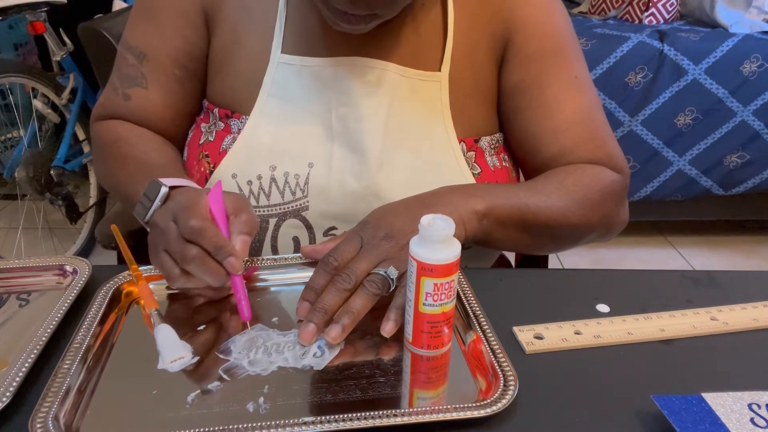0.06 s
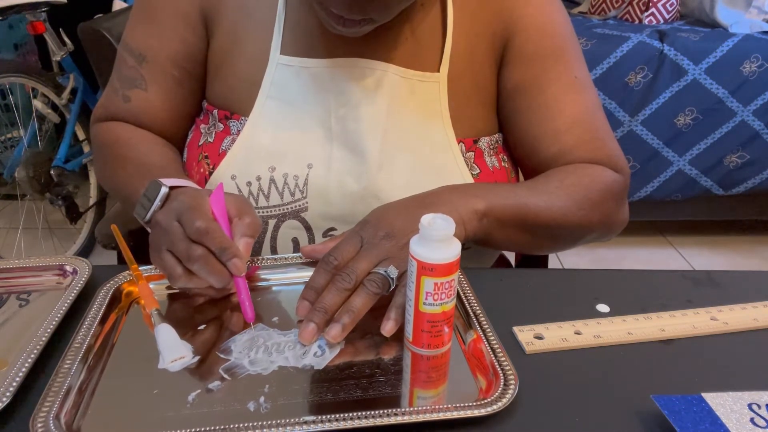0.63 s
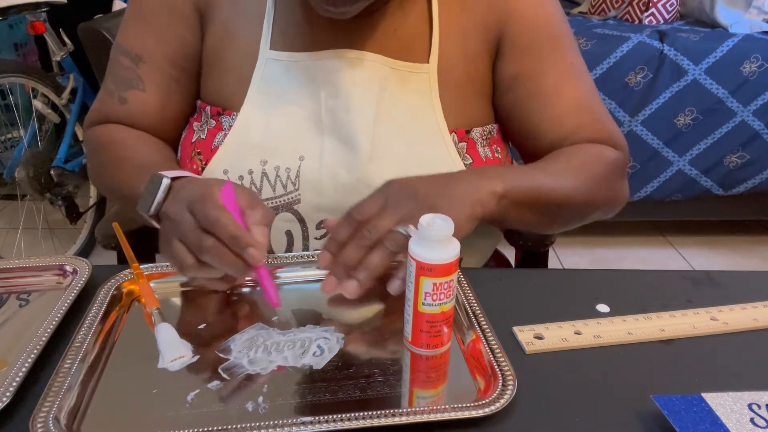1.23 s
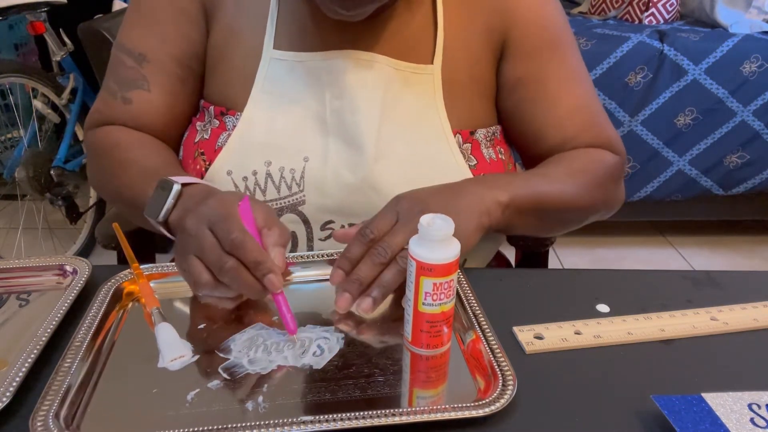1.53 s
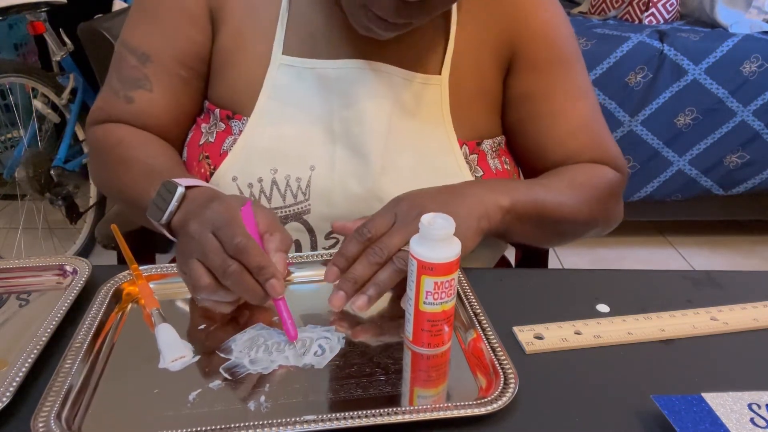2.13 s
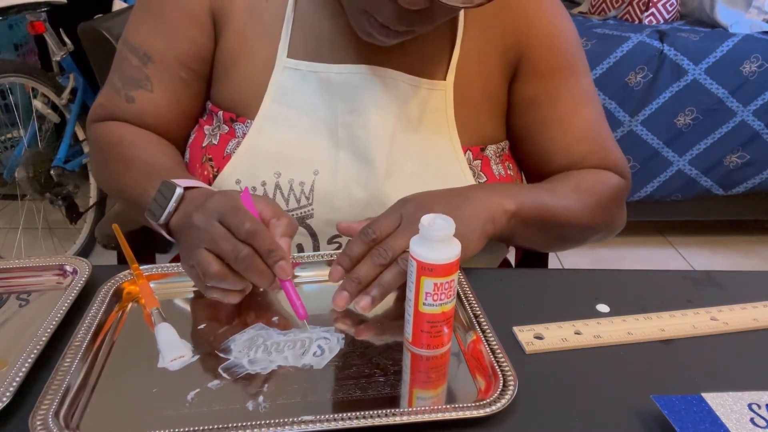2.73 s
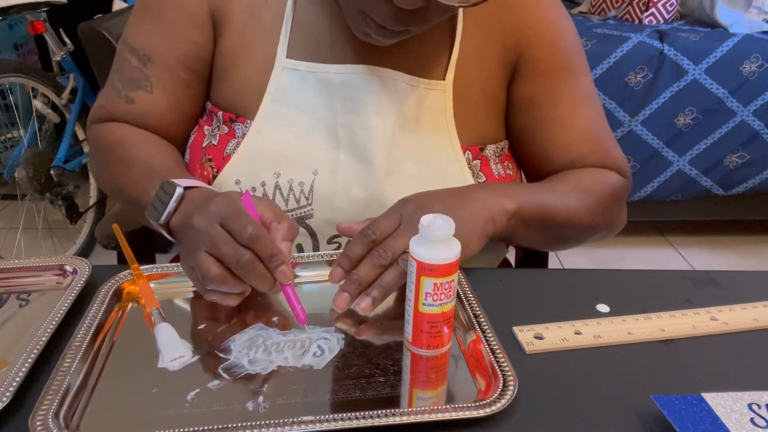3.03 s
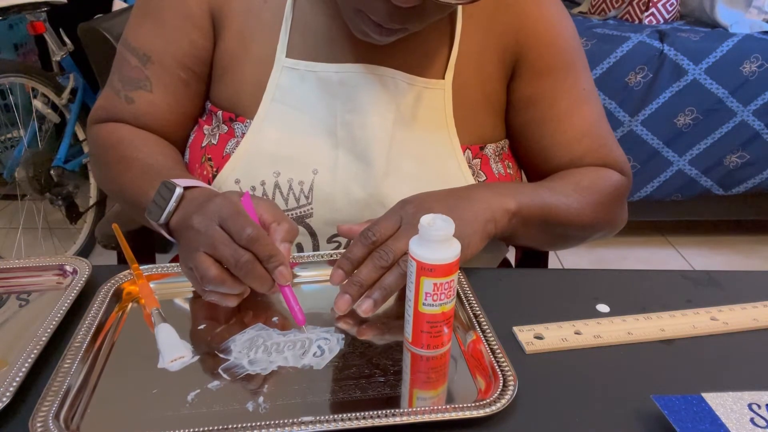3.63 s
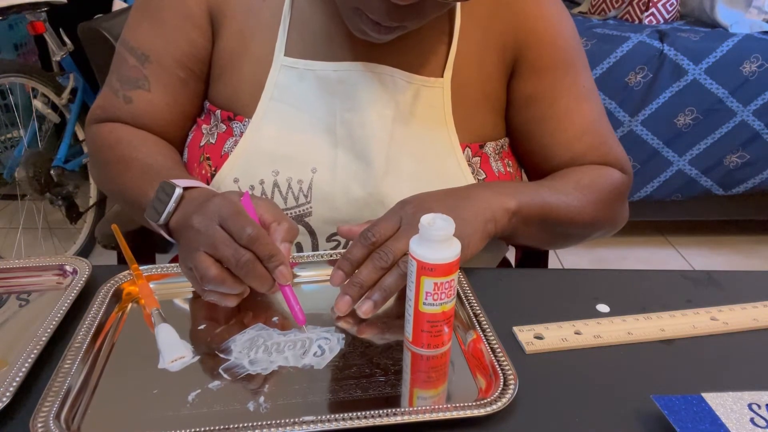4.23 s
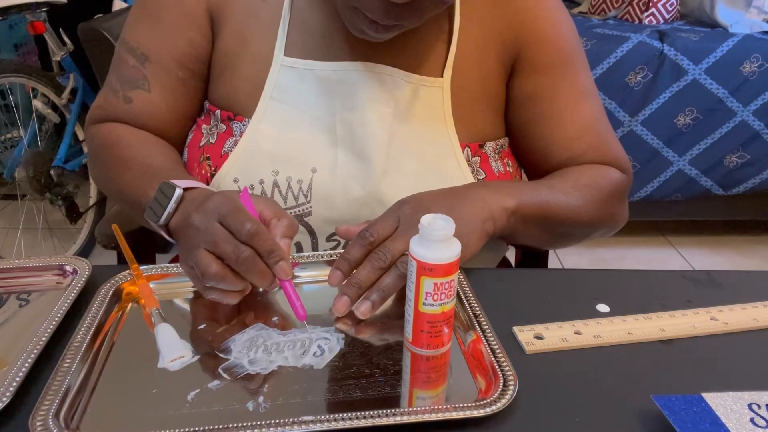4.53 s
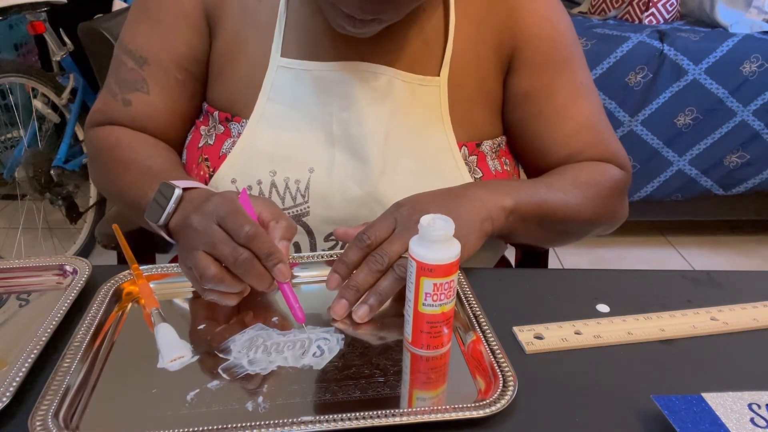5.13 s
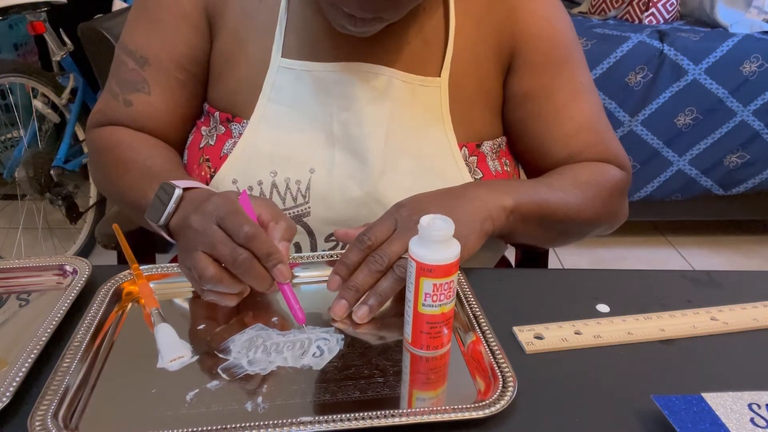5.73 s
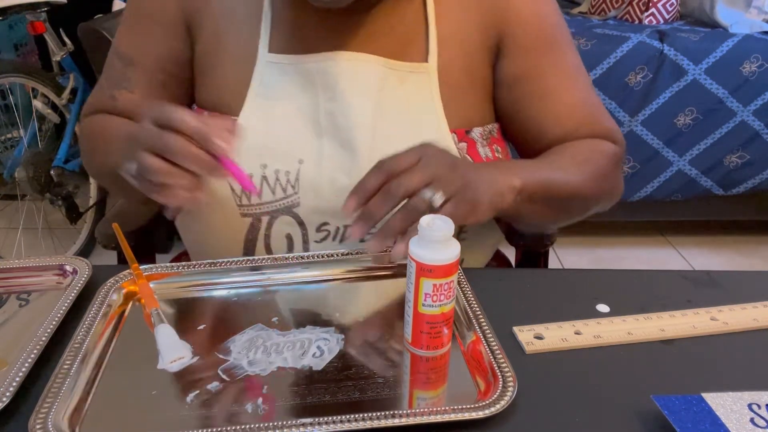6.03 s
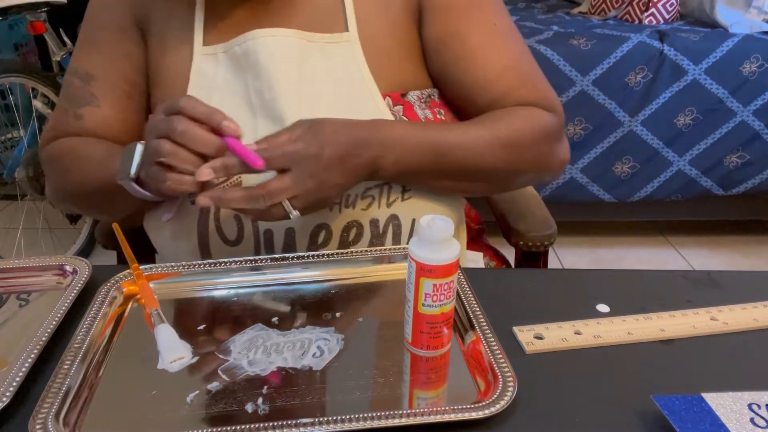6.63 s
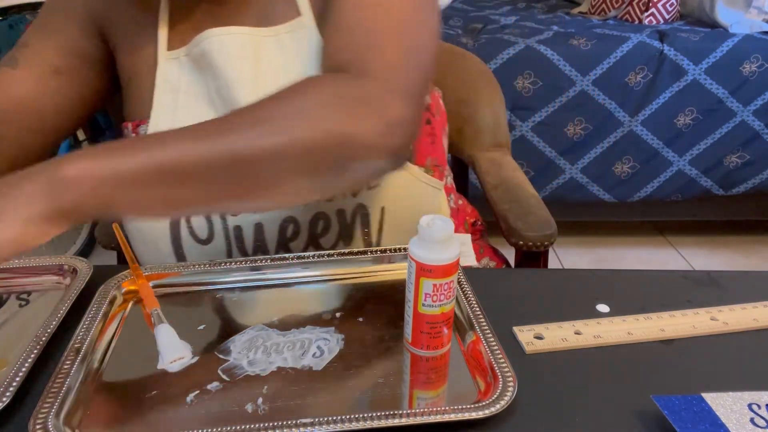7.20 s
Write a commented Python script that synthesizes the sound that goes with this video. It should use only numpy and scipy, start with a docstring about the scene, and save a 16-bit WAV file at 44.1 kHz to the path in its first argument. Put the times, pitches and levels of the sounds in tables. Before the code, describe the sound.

A pointed tool and fingertips press glued paper onto a metal tray on a table, heard from nearby in a small room. In the first second come four soft, dull knocks with small clacks and a tiny sticky snap, then a faint cloth rustle. After a pause, single taps land at about 2.0 and 2.6 seconds, with a short cluster around 3.1, mixed with faint ticks of tacky glue. The two loudest knocks fall at 4.3 and 4.9 seconds, each with a brief, damped metallic ring. Paper snaps lightly at 4.8 and 5.6, and a quick run of taps follows near 5.8. From there the hands slide off, rub together and brush an apron with soft, dry swishes. The tray gives one low, ringing bump at about 7.3 seconds. Underneath, a low appliance hum grows from about two seconds and stays.

```python
"""Pressing glued paper onto a metal tray

A pointed craft tool and fingertips press small glued paper pieces onto a metal tray on a table.
Each press thumps the damped tray, the tip clacks, and the tacky paper snaps and ticks as it lets go.
Then the hands slide off, rub together and brush an apron. An appliance hums low in the small room."""
import sys
import numpy as np
from scipy import signal
from scipy.fft import rfft, irfft
from scipy.io import wavfile
from scipy.ndimage import uniform_filter1d

SR = 44100
rng = np.random.default_rng(int(sys.argv[2]) if len(sys.argv) > 2 else 0)


def unload_wav(signal):
    """Save mono or channel-first audio to the path in sys.argv[1] as 16-bit WAV at rate SR, clipped to [-1, 1]."""
    wavfile.write(
        sys.argv[1],
        SR,
        np.round(np.clip(np.atleast_2d(signal).T, -1, 1) * 32767).astype(np.int16),
    )


N = 328967
TIME = np.arange(N) / SR

# Levels are relative: the functions add gains of their own.
# tone of the room's air: f/Hz, level/dB
AIR_TONE = [(15, -41.5), (25, -25.5), (41, -3.5), (64, -5.5), (78, -14), (87, -20.5), (120, -12.5),
            (190, -31.5), (236, -25.5), (363, -36), (516, -49.5), (796, -44.5), (1440, -56), (9840, -69.5),
            (16000, -76)]
# how the hum swells: t/s, level/dB
HUM_SWELL = [(0.1, -59.5), (1.24, -60), (2.4, -46.5), (5.49, -41.5), (7.4, -45)]
# the tones in the hum: multiple of the lowest pitch, level/dB
HUM_TONES = [(1, -1), (2, -18), (4, -28)]
# time the room's echo takes to fade by 60 dB: f/Hz, fade/s
ROOM_FADE = [(100, 0.35), (400, 0.25), (1500, 0.26), (5000, 0.13), (14000, 0.16)]
# arms brushing the apron: t/s, length/s, level/dB
APRON_STROKES = [(0.802, 0.64, -67), (6.027, 0.65, -61), (6.914, 0.71, -73), (7.391, 1, -59)]
# tone of rustling cloth: f/Hz, level/dB
CLOTH_TONE = [(150, -9), (310, 11.5), (520, -19), (680, 2), (950, -8), (1400, -12), (1900, -11.5),
              (5000, -21), (8000, -35), (16000, -41)]
# skin sliding on paper, tray and skin: t/s, length/s, level/dB, brightness/(dB per octave)
RUB_STROKES = [(0.851, 0.084, -76.5, 4.5), (1.156, 0.3, -84, 3.5), (5.773, 0.32, -72.5, 8),
               (6.265, 0.28, -70.5, 5.5), (6.45, 1, -87, 3.5), (6.736, 0.1, -78, 6.5),
               (6.915, 0.13, -84.5, 5), (7.17, 0.19, -83, 11), (7.439, 0.12, -67.5, 11)]
# tone of sliding skin: f/Hz, level/dB
SKIN_TONE = [(200, -15), (500, 11), (850, 25.5), (1300, 13), (2000, 13.5), (3200, 7), (4800, 1.5),
             (7500, -5), (11000, -9), (16000, -21)]
# hands scuffing tray and apron: t/s, length/s, level/dB, f/Hz, width as a frequency ratio
HAND_SCUFFS = [(5.821, 0.051, -59.5, 3800, 2.9), (6.155, 0.16, -66.5, 680, 1.35),
               (6.747, 0.14, -70, 890, 1.33), (6.91, 0.3, -73.5, 923, 1.57), (7.389, 0.21, -65, 997, 1.5)]
# tiny ticks of tacky glue: t/s, level/dB, f/Hz
GLUE_TICKS = [(0.237, -84, 3620), (0.544, -75, 4180), (0.716, -87, 4100), (1.606, -87, 10200),
              (2.049, -72, 11200), (2.121, -81.5, 4400), (2.577, -79, 4770), (2.626, -70.5, 6000),
              (3.064, -84, 4300), (3.2, -79.5, 5640), (4.576, -78, 10500)]
# paper snapping free of the glue: t/s, level/dB, f/Hz of its ring
PAPER_SNAPS = [(0.617, -64, 6950), (0.877, -73.5, 4460), (0.898, -69.5, 4400), (2.048, -73, 5070),
               (4.798, -62.5, 4100), (5.617, -62, 5570)]
# tone of a snap: f/Hz, level/dB
SNAP_TONE = [(300, -79), (1500, 7), (3000, 6.5), (4200, 2), (6300, 7), (8000, 0), (11000, 5), (13500, -5),
             (16000, -8)]
# the tray's natural tones (modes) as it lies on the table: f/Hz, level/dB, 60 dB fade/s
TRAY_MODES = [(121, 4.5, 0.13), (148.1, -5, 0.29), (241.9, 2.5, 0.14), (303, -0.5, 0.16),
              (340.6, 6.5, 0.04), (420, 0.5, 0.016), (507, -2, 0.061), (588.6, -10, 0.21),
              (707, -0.5, 0.12), (785, -0.5, 0.076), (997.5, 0, 0.11), (1363, -8.5, 0.058),
              (1619, -5.5, 0.071), (1862, -9, 0.13), (1991, 6, 0.041), (2343, -5.5, 0.1),
              (2610, -14.5, 0.17), (4910, 5.5, 0.13)]
# tone of the tip's clack: f/Hz, level/dB
CLACK_TONE = [(150, -12), (400, 9.5), (570, -6.5), (750, 0), (1000, -2.5), (1600, -12.5), (2000, -14),
              (2700, -17.5), (5500, -29.5), (7500, -47.5), (16000, -61)]
# presses: t/s, thump level/dB, push f/Hz (low = soft), clack level/dB, drag/s, ring level/dB, ring f/Hz
TRAY_PRESSES = [(0.155, -46, 140.5, -59, 0.017, -65, 1170), (0.405, -46, 134.8, -59, 0.003, -68.5, 1350),
                (0.617, -48, 144.7, -54, 0.0027, -61.5, 1450), (0.878, -61, 210, -76, 0.0035, -72.5, 1500),
                (0.901, -56, 207, -69.5, 0.013, -71, 1620), (2.050, -44.5, 188, -49.5, 0.005, -68, 1880),
                (2.624, -45, 158, -58.5, 0.0026, -68.5, 1040), (2.858, -55.5, 249, -72, 0.0029, -79, 740),
                (3.063, -65, 246, -62.5, 0.004, -75.5, 1290), (3.143, -42.5, 313, -53.5, 0.0021, -76, 990),
                (3.199, -45, 192, -60.5, 0.0079, -71, 1070), (4.304, -35.5, 347, -46, 0.0013, -65, 905),
                (4.37, -49.5, 259, -71, 0.0025, -76, 885), (4.798, -58, 201, -59, 0.0023, -66, 1700),
                (4.892, -35, 341, -45, 0.0013, -65, 834), (4.947, -45, 289, -65.5, 0.0034, -67.5, 880),
                (5.617, -54.5, 262, -54.5, .003, -62.5, 1250), (5.744, -57, 310, -68, 0.00147, -73, 915),
                (5.809, -50, 225, -57.5, 0.007, -67, 2000), (5.829, -47, 188, -44, 0.011, -58.5, 1530),
                (5.858, -44.5, 199.5, -51.5, 0.0051, -65, 670),
                (7.326, -49.5, 195.3, -68, 0.011, -46.5, 234)]
# how alike noise is at the two microphones: f/Hz, likeness (1 = the same)
STEREO_LIKENESS = [(60, 0.81), (200, 0.84), (500, 0.056), (1500, 0.068), (4000, 0.33), (10000, 1)]
# how far the left microphone's wave runs ahead: f/Hz, phase/rad
LEFT_LEAD = [(0, -1), (300, 0.48), (1000, -1), (2600, -0.9), (4200, -2), (6700, -2.5), (9000, -1.85),
             (12000, 0), (16000, -1.7)]
# how much louder the right microphone is: f/Hz, level/dB
RIGHT_BOOST = [(100, 3.4), (1000, 2.4), (4000, 2.0), (12000, 0.3)]
# bass cuts for the air and for the echo: f/Hz, level/dB
AIR_CUT = [(25, -14), (58, -12), (95, 0.038)]
ECHO_CUT = [(400, -5), (1200, 0.015)]


def amp(db):
    """Turns decibels into a gain."""
    return 10 ** (np.asarray(db) / 20)


def unit(x):
    """Scales a signal to an average (rms) level of 1."""
    return x / np.sqrt(np.mean(x ** 2) + 1e-30)


def read(points, hz):
    """Looks up a table between its rows, on a scale of pitch."""
    f, value = np.transpose(points)
    return np.interp(np.log(hz + 1), np.log(f + 1), value)


def add(mix, start, sound):
    """Mixes a sound in at a start time in seconds."""
    part = mix[..., max(round(start * SR), 0):][..., :sound.shape[-1]]
    part += sound[..., :part.shape[-1]]


def sized(x, db):
    """Gives a short sound the energy of 40 ms at this level."""
    return amp(db) * x / np.sqrt(np.mean(np.sum(x ** 2, -1)) / (.04 * SR) + 1e-30)


def colour(x, tone, size=2048):
    """Shapes a sound's tone with a filter that never rings early, so hits stay sharp."""
    log_gain = np.log(amp(read(tone, abs(np.fft.fftfreq(size, 1 / SR)))))
    taps = np.fft.ifft(np.exp(np.conj(signal.hilbert(log_gain)))).real
    return signal.fftconvolve(x, taps[None, :size // 2], axes=1)


def peak(hz, width):
    """A tone shape with one peak, 22 dB down at hz / width and hz * width."""
    return [(hz / 8, -60), (hz / width, -22), (hz, 0), (hz * width, -22), (hz * 3, -44)]


def noise(tone, size=512):
    """Shaped noise split into frequency bands over time, partly alike on left and right."""
    hz, t, (left, other) = signal.stft(rng.standard_normal((2, N)), SR, nperseg=size)
    same = np.clip(read(STEREO_LIKENESS, hz), -1, 1)[:, None]
    right = same * left + np.sqrt(1 - same ** 2) * other
    return hz, t, np.array([left, right]) * amp(read(tone, hz))[:, None]


def wave(bands):
    """Joins frequency bands back into sound."""
    return signal.istft(bands, SR)[1][:, :N]


def air(level_db=-65):
    """Steady room rumble and faint hiss; the level is that of the part above 150 Hz."""
    hz, _, bands = noise(AIR_TONE, size=4096)
    gain = amp(level_db) / wave(bands * (hz > 150)[:, None]).std()
    return gain * wave(bands * amp(read(AIR_CUT, hz))[:, None])


def hum(hz=58.94, gain_db=-3.5, drift_rad=0.38):
    """A motor's low tone and overtones, each wavering a little."""
    knots = np.arange(0, TIME[-1] + 1, 0.1)
    tones = 0
    for multiple, db in HUM_TONES:
        waver = drift_rad * np.interp(TIME, knots, rng.standard_normal(len(knots)))
        tones = tones + amp(db) * np.sin(multiple * (2 * np.pi * hz * TIME + waver))
    return np.sqrt(2) * tones * amp(gain_db + np.interp(TIME, *np.transpose(HUM_SWELL)))


def room_echo(x, gap_s=0.0015):
    """Sound bounces around a small furnished room, each band fading at its own speed."""
    size = SR // 2
    bounces = rng.choice([-1., 1.], (2, size)) * (rng.random((2, size)) < 0.1)
    hz, t, bands = signal.stft(bounces * (np.arange(size) > gap_s * SR), SR, nperseg=256)
    fade_db = 60 * t / read(ROOM_FADE, hz)[:, None]
    tail = wave(bands * amp(read(ECHO_CUT, hz)[:, None] - fade_db))
    return signal.fftconvolve(x, tail / np.linalg.norm(tail[0]), axes=1)[:, :N]


def stroke(start, length, skew):
    """A hand speeds up and slows to rest: one arch of loudness, peaking early if skew is under 1."""
    progress = np.clip((TIME - start) / length, 0, 1)
    return abs(np.sin(np.pi * progress ** skew))


def grain(depth_db, size=90, samples=N):
    """Rubbing surfaces catch and slip, so the level flickers."""
    return unit(amp(depth_db * unit(uniform_filter1d(rng.standard_normal(samples), size))))


def patchy(bands, depth_db=2.5):
    """The tone shifts as different patches of skin and cloth touch."""
    patches = uniform_filter1d(rng.standard_normal(bands.shape[1:]), size=7, axis=0)
    patches = uniform_filter1d(patches, size=7, axis=1)
    return bands * amp(depth_db * unit(patches))


def apron():
    """Cloth gives a dull rustle as the arms move over it."""
    moves = sum(amp(db) * stroke(start, length, skew=0.62) for start, length, db in APRON_STROKES)
    _, _, bands = noise(CLOTH_TONE)
    return unit(wave(patchy(bands))) * moves * grain(depth_db=2.0, size=400)


def rubs(gain_db=0.5):
    """Sliding skin makes a dry hiss; each stroke has its own brightness."""
    hz, t, bands = noise(SKIN_TONE)
    octaves = np.log2(np.maximum(hz, 600) / 10000)[:, None]
    treble_level = wave(bands * (hz > 6500)[:, None]).std()
    strokes = sum(amp(db + octaves * bright) * np.interp(t, TIME, stroke(start, length, skew=0.88))
                  for start, length, db, bright in RUB_STROKES)
    return amp(gain_db) * wave(patchy(bands) * strokes) / treble_level * grain(depth_db=0.5)


def scuffs():
    """A hand grips and slips in quick catches, stirring one pitch of the thing it rubs."""
    out = np.zeros((2, N))
    for start, length, db, hz, width in HAND_SCUFFS:
        slips = (rng.standard_normal(N) + rng.standard_normal((2, N))) * grain(depth_db=2.0)
        scuff = unit(colour(slips, peak(hz, width))[:, :N])
        out += amp(db) * scuff * stroke(start, length, skew=0.38)
    return out


def burst(drag_s, linger_db, linger_s, click=3.25, size=4096):
    """A click inside a gritty crack while the contact drags, then a weaker scatter off tray and table."""
    t = np.arange(size) / SR
    shared, left, right = rng.standard_normal((3, size))
    grit = grain(depth_db=2.5, size=40, samples=size)
    crack = (shared + 1.1 * np.array([left, right])) * grit * np.exp(-t / drag_s)
    scatter = (shared + rng.standard_normal((2, size))) * amp(linger_db) * np.exp(-t / linger_s)
    out = (crack + scatter) * (1 - np.exp(-t / (0.59 * drag_s)))
    out[:, round(drag_s * SR) % size] += click
    return out


def ticks():
    """Small threads of glue part, each with a short pitched tick."""
    out = np.zeros((2, N))
    for start, db, hz in GLUE_TICKS:
        crack = burst(drag_s=0.00139, linger_db=-17, linger_s=0.011)
        add(out, start, sized(colour(crack, peak(hz, width=1.26)), db))
    return out


def snaps(ring_db=-3):
    """Tacky paper lets go with a bright snap; each piece rings briefly at its own pitch."""
    out = np.zeros((2, N))
    for start, db, hz in PAPER_SNAPS:
        crack = burst(drag_s=0.003, linger_db=-19.5, linger_s=0.028)
        snap = sized(colour(crack, SNAP_TONE), db)
        ring = sized(colour(crack, peak(hz, width=1.53)), db + ring_db)
        add(out, start, snap + ring)
    return out


def tray(force, weight_db=0, spot_db=2.5, left_lag_s=0.00028):
    """A force rings the tray's modes; each struck spot shifts their levels and tuning a little."""
    t = np.maximum(np.arange(SR // 3) / SR - np.array([[left_lag_s], [0]]), 0)
    signs = (-1) ** (np.arange(len(TRAY_MODES)) // 2)  # pairs of modes swing opposite ways
    gains = amp(weight_db + spot_db * rng.standard_normal(len(TRAY_MODES))) * signs
    tuning = rng.uniform(.992, 1.008)
    ring = sum(gain * amp(db - 60 * t / fade_s) * np.sin(2 * np.pi * hz * tuning * t)
               for (hz, db, fade_s), gain in zip(TRAY_MODES, gains))
    return signal.fftconvolve(ring, force, axes=1)


def tray_ring(ring_hz, drag_s, db_per_octave=13):
    """The tray's ring builds while the tip drags, strongest in the modes near ring_hz."""
    octaves_away = abs(np.log2(np.transpose(TRAY_MODES)[0] / ring_hz))
    ring = tray(np.ones((1, 1)), -db_per_octave * octaves_away, left_lag_s=.00002)
    return ring * (1 - np.exp(-np.arange(ring.shape[1]) / (SR * drag_s)))


def tip_ping(thump_db, hz=7930, fade_s=0.14, level_db=-76, hard_db=-36):
    """The steel point pings, loud enough to hear only under the hardest blows."""
    t = np.arange(SR // 4) / SR
    ping = np.sin(2 * np.pi * hz * t) * amp(-60 * t / fade_s) * (1 - np.exp(-t / 0.016))
    return sized(ping, level_db + 4 * min(thump_db - hard_db, 0))


def tip_clack(clack_db, drag_s, softness, hard_db=-54, dull_db=2, rattle_db=17.5):
    """The tip hits the tray: a hard touch is brighter, a soft one is duller and rattles on."""
    crack = burst(drag_s, linger_db=-15 + rattle_db * (softness - 0.5), linger_s=0.021)
    hz, db = np.transpose(CLACK_TONE)
    hardness_db = clack_db - dull_db * (softness - 1) - hard_db
    treble_share = read([(2000, 0.22), (5000, 0.98)], hz)
    tone = np.transpose([hz, db + 0.53 * hardness_db * treble_share])
    return sized(colour(crack, tone), clack_db - 4.5)


def push(t, hz):
    """One push and release, centred on t = 0; a lower hz makes it slower."""
    spread = (np.pi * hz * t) ** 2
    return (1 - 2 * spread) * np.exp(-spread)


def thump(push_hz, heel_hz=128, heel_db=-17, heel_delay_s=0.0075):
    """The hand's weight pushes the tray 20 ms in; the heel of the hand follows, slower and lower."""
    t = np.arange(-SR // 50, SR // 25) / SR
    force = push(t, push_hz) + amp(heel_db) * push(t - heel_delay_s, heel_hz)
    return tray(force[None])


def presses(firm_hz=200.2, firm_delay_s=0.00714):
    """The tip clacks, the tray rings and the hand's weight follows, lower and later if it is soft."""
    out = np.zeros((2, N))
    for start, thump_db, push_hz, clack_db, drag_s, ring_db, ring_hz in TRAY_PRESSES:
        softness = firm_hz / push_hz
        landing = start + firm_delay_s * softness ** 2.266
        add(out, landing - 0.02, sized(thump(push_hz), thump_db))
        add(out, start, tip_clack(clack_db, drag_s, softness))
        add(out, start, sized(tray_ring(ring_hz, drag_s), ring_db))
        add(out, start, tip_ping(thump_db))
    return out


def scene(echo_db=-9):
    """The work of the hands and its echo, over the hum and the room's air."""
    work = presses() + snaps() + ticks() + rubs() + scuffs() + apron()
    return work + amp(echo_db) * room_echo(work) + hum() + air()


def record(dry, top_hz=16150):
    """Two microphones differ in phase and the right is louder in the lows; the top treble is cut."""
    hz = np.fft.rfftfreq(N, 1 / SR)
    boost_db = read(RIGHT_BOOST, hz)
    balance = amp(np.array([-boost_db, boost_db]) / 2)
    phase = np.exp(.5j * np.outer([1, -1], read(LEFT_LEAD, hz)))
    heard = irfft(rfft(dry) * balance * phase, N)
    treble_cut = signal.firwin(511, top_hz, window=("kaiser", 9), fs=SR)
    return signal.oaconvolve(heard, treble_cut[None], "same")


dry = scene()
out = record(dry)
unload_wav(out)
```